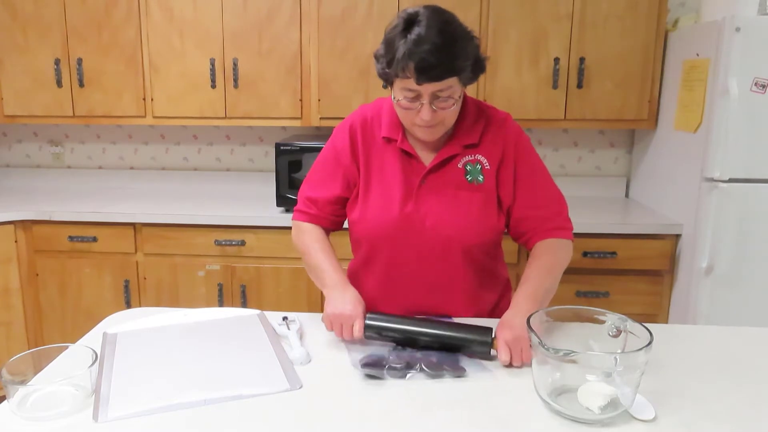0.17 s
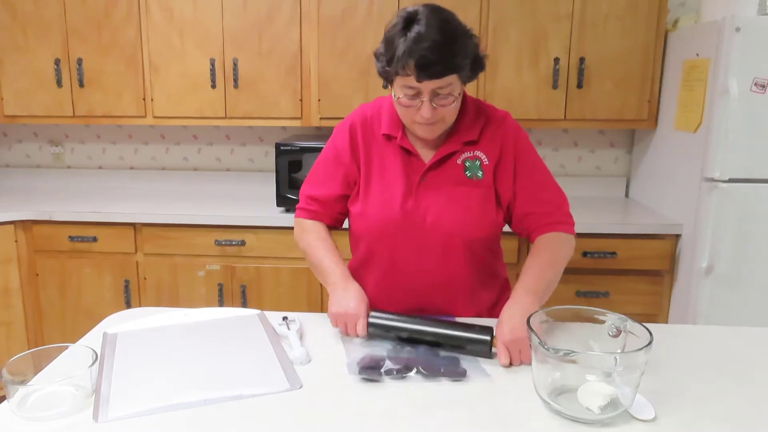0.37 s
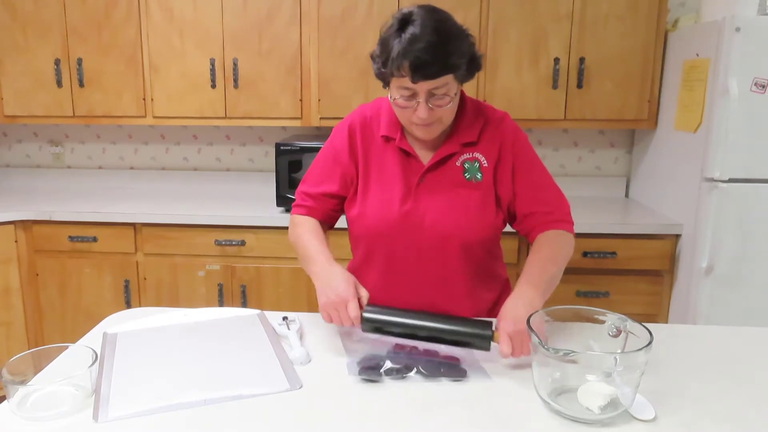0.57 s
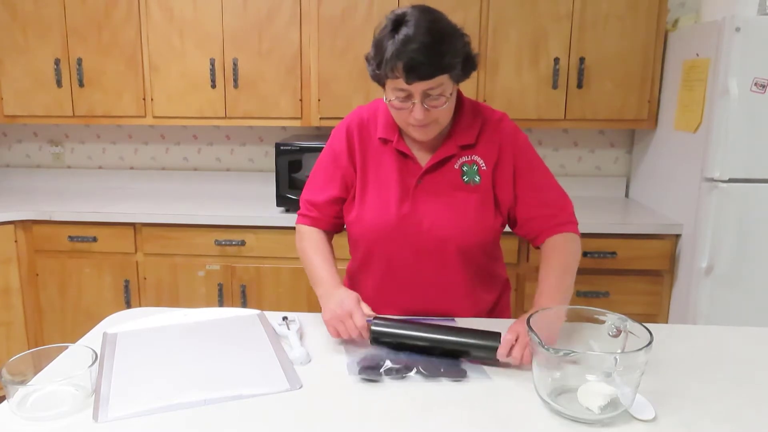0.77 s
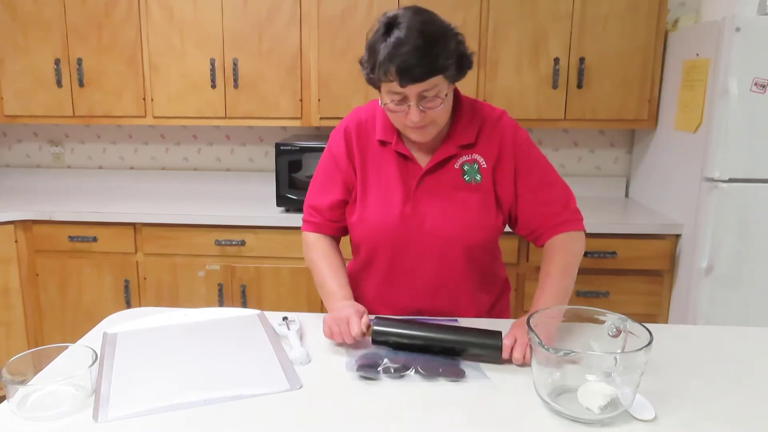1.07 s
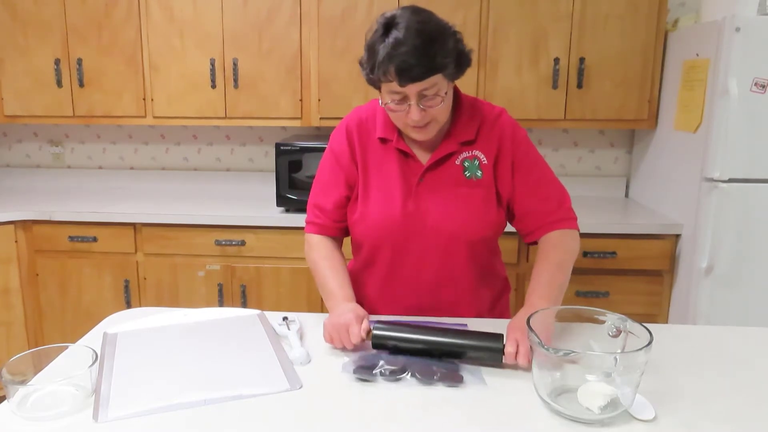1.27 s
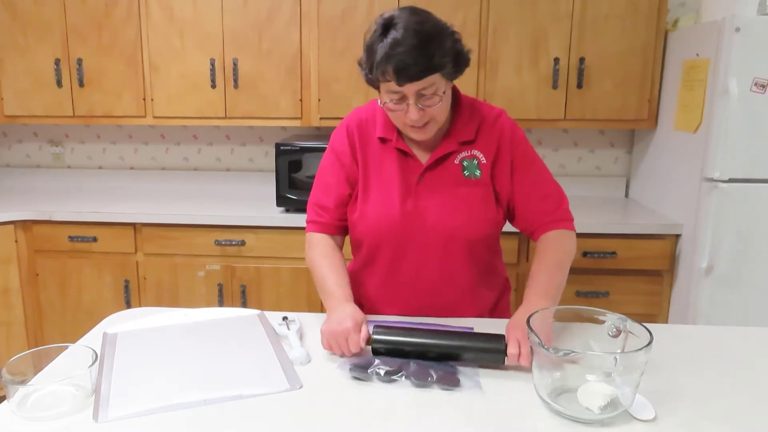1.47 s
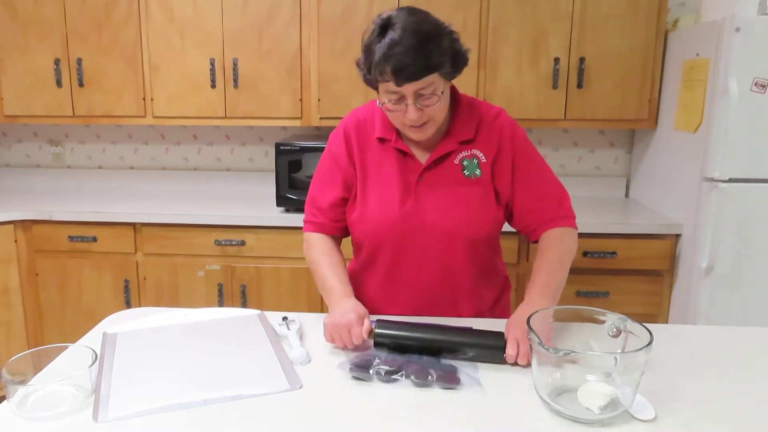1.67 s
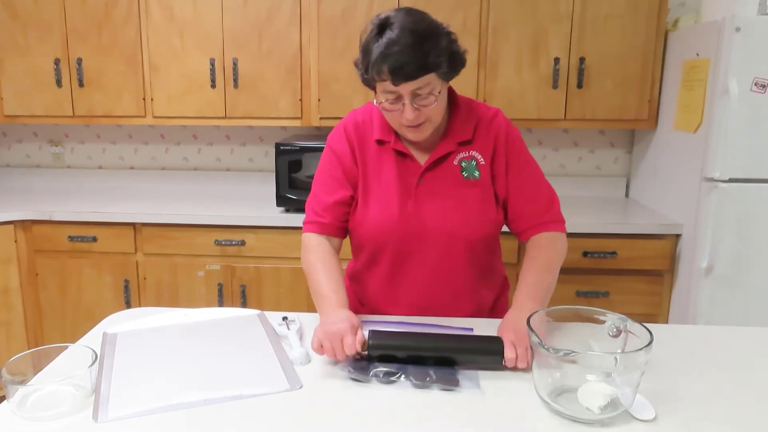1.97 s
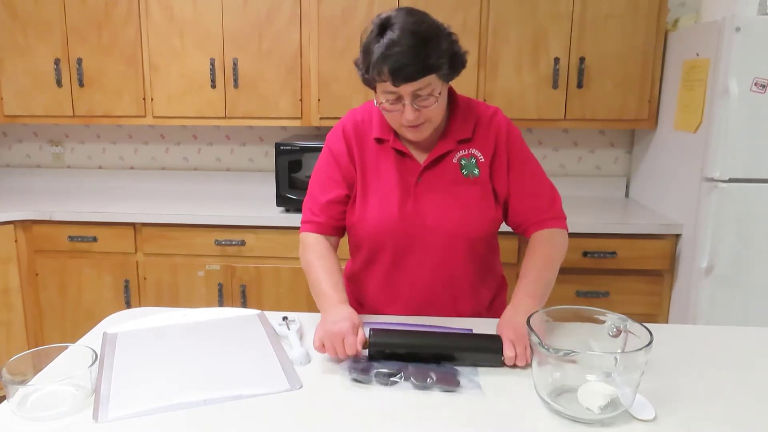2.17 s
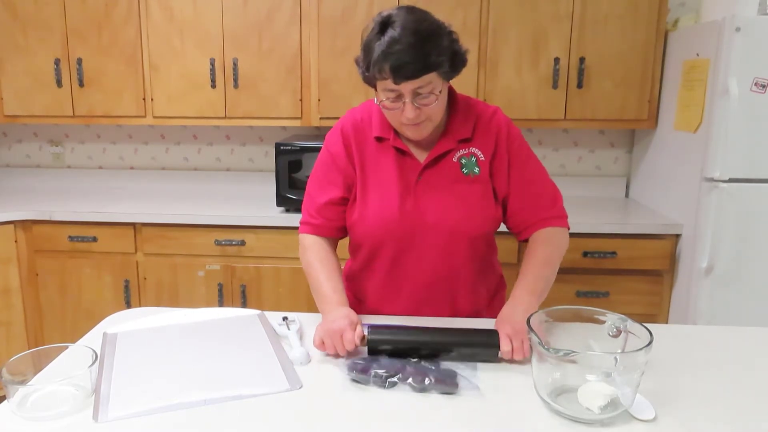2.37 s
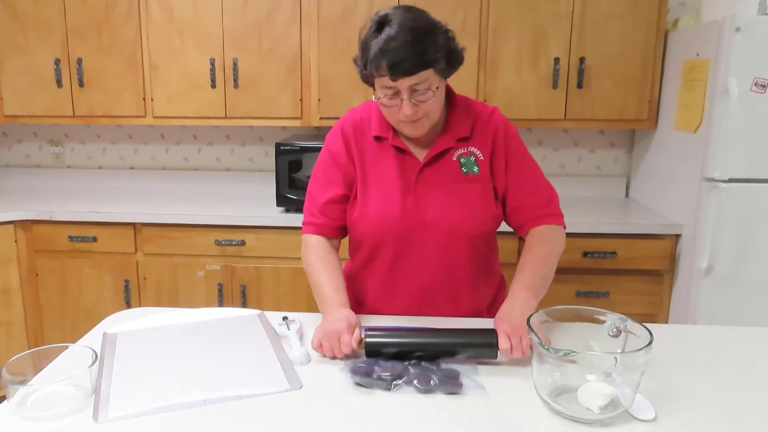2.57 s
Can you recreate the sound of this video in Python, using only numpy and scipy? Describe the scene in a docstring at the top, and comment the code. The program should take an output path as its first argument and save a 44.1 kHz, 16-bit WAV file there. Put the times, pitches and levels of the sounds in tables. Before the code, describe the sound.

Gritty cookie crushing in short rolling-pin strokes, with sharp cracks, bag crinkle and dull counter knocks

```python
"""Cookies in a plastic bag crack under a heavy rolling pin pushed in short strokes on a kitchen counter.
Crumbs are dense random clicks that excite short resonances; snaps are quickly dying noise bursts.
The counter top knocks and rumbles, the pin rings faintly and the cabinet booms, all as banks of
damped modes. Feedback delays make the kitchen's answer; shaped noise is the background air."""
import sys
import numpy as np
from scipy import signal
from scipy.fft import rfft, irfft, next_fast_len
from scipy.io import wavfile

SR = 44100
rng = np.random.default_rng(int(sys.argv[2]) if len(sys.argv) > 2 else 0)


def nominal_scale(level):
    """Amplitude ratio for a level in decibels (scalar or array-like)."""
    x = np.asarray(level, float) / 20
    return 10 ** x


def transcribe(signal):
    """Save signal, clipped to [-1, 1], as a 16-bit WAV file at the path in sys.argv[1]."""
    frames = np.atleast_2d(signal).T
    limited = np.clip(frames, -1, 1)
    pcm = np.round(limited * 32767).astype(np.int16)
    wavfile.write(sys.argv[1], SR, pcm)


N = 121275  # samples

# spectrum of cracking crumbs, shared by grit and snaps: pitch_hz, level_db
CRUMB_SPECTRUM = [(410, -4), (680, -10), (800, -16), (1360, 0.5), (1610, -7), (2830, -2), (7040, -12.5),
                  (13300, -29.5), (15800, -35)]


def rms_one(x):
    """Normalization: scales a signal to unit root mean square."""
    return x / np.sqrt(np.mean(x ** 2) + 1e-20)


def in_time(rows):
    """Linear interpolation: turns (time, values) rows into one curve per value column."""
    s, *columns = np.transpose(rows)
    return [np.interp(np.arange(N) / SR, s, column) for column in columns]


def high_pass(x, hz, order=2):
    """Butterworth filtering: attenuates what lies below the corner."""
    return signal.sosfilt(signal.butter(order, hz, "high", fs=SR, output="sos"), x)


def colour(x, points):
    """Spectral shaping: weights a sound by a table of levels over log frequency."""
    hz, db = np.transpose(points)
    f = np.maximum(np.fft.rfftfreq(N, 1 / SR), 1)
    return irfft(rfft(x) * nominal_scale(np.interp(np.log(f), np.log(hz), db)), N)


def drift(rate_hz):
    """Low-passed noise: a smooth random curve of rms 1."""
    r = np.exp(-2 * np.pi * rate_hz / SR)
    noise = rng.standard_normal(N + SR)
    return rms_one(signal.lfilter([1], [1, -2 * r, r * r], noise)[SR:])


def grains(per_s, spread_db):
    """Random impulse train: clicks of chance time, size and sign, with rms 1."""
    sizes = nominal_scale(spread_db * np.minimum(rng.exponential(1, N), 5)) * rng.choice([-1, 1], N)
    return rms_one(sizes * (rng.random(N) < per_s / SR))


def ring(clicks, hz, t60):
    """Damped resonator: a unit click sets going a decaying sine of initial height 1."""
    r = nominal_scale(-60 / (max(t60, .001) * SR))
    w = 2 * np.pi * min(hz, .45 * SR) / SR
    return signal.lfilter([0, np.sin(w)], [1, -2 * r * np.cos(w), r * r], clicks + 1e-18)


def body(clicks, modes):
    """Modal superposition: a solid sounds as the sum of its damped modes."""
    return sum(nominal_scale(db) * ring(clicks, hz, t60) for hz, db, t60 in modes)


def struck(rows, modes, soft_hz):
    """Impact excitation: a soft blow spares high modes and drives each with a chance strength."""
    s, db = np.transpose(rows)
    chance_db = rng.normal(0, 2.5, (len(s), len(modes)))
    out = 0
    for k, (hz, level_db, t60) in enumerate(modes):
        clicks = np.zeros(N)
        clicks[(s * SR).astype(int)] = -nominal_scale(db + level_db + chance_db[:, k])
        out = out + ring(clicks, hz, t60)
    r = np.exp(-2 * np.pi * soft_hz / SR)
    return signal.lfilter([(1 - r) ** 2], [1, -2 * r, r * r], out)


def stroke_rows():
    """Piecewise envelope: each stroke holds its last levels until the next sets in within 1 ms."""
    # strokes of the pin, one list each: time_s, grit_db, counter_rumble_db, grit_treble_db
    strokes = [
        [(0.0, -47.5, -44, 13.5), (0.076, -60, -68, 6), (0.142, -80, -60, -13), (0.17, -51.5, -61, -30),
         (0.19, -54.5, -56, 2)],
        [(0.199, -32, -21, -9), (0.205, -18, -15, -1.5), (0.233, -39, -31, -5), (0.297, -43.5, -36.5, 9.5),
         (0.325, -39.5, -36, -5)],
        [(0.333, -34, -32.5, 11), (0.379, -29, -20, 5.5), (0.413, -32, -32, 4), (0.477, -36.5, -35, -4),
         (0.55, -58, -54, -11)],
        [(0.558, -47.5, -74, 5), (0.6, -61.5, -80, 1)],
        [(0.611, -47, -68, 12), (0.639, -60.5, -71, -10), (0.697, -72, -55.5, -16), (0.75, -66.5, -55, 7)],
        [(0.766, -26, -39, 0), (0.79, -34, -39.5, 7.5), (0.854, -40, -43.5, 1.5), (0.98, -83, -78, -21),
         (1.03, -59.5, -67, -7.5)],
        [(1.032, -65, -73, 7), (1.072, -42, -34, 6.5), (1.138, -58.5, -42.5, 4), (1.17, -53, -39, 7)],
        [(1.183, -38.5, -21, 6.5), (1.295, -61.5, -53, 17), (1.317, -42.5, -32, 4), (1.395, -39.5, -30, 2),
         (1.41, -42, -22.5, 10)],
        [(1.417, -31, -6.5, -42), (1.443, -44.5, -19.5, 7.5), (1.609, -54.5, -45, 6.5),
         (1.693, -40.5, -28.5, 6.5), (1.82, -65.5, -52.5, 1)],
        [(1.833, -31, -80, -26), (1.843, -42, -69, -31), (1.861, -82, -83.5, -10), (1.943, -66, -68, 3),
         (1.98, -66, -48, 1)],
        [(1.994, -37, -33, 4), (2.126, -33, -18, 2.7), (2.328, -66, -64.5, 16.5), (2.365, -49.5, -32, 11)],
        [(2.376, -34.5, -8.5, -31), (2.388, -38, -12.5, 8), (2.445, -37.5, -24.5, 4), (2.51, -50, -39, 12),
         (2.61, -58.5, -50, 17)],
        [(2.628, -62.5, -49, 10), (2.676, -45, -35, 9), (2.75, -60, -76, 22)],
    ]
    held = []
    for rows, after in zip(strokes, strokes[1:]):
        held.append(rows + [(after[0][0] - .001, *rows[-1][1:])])
    rows = np.vstack(held + strokes[-1:])
    rows[:, 0] = np.maximum.accumulate(rows[:, 0])
    return rows


def grit(level_db, treble_db):
    """Granular fracture: crumbs crack in clumps, each crack ringing briefly at one of 20 pitches."""
    # resonances of bag and crumbs on the counter: pitch_hz, level_db, t60_s
    bag_modes = [(1198, 6.5, 0.0096), (2467, -3.5, 0.029), (2970, 3.5, 0.0032)]
    # strength of those resonances against the grit: time_s, level_db
    bag_level = [(0, 1), (.25, -19), (1.1, -8.5), (2.75, -6)]
    cracks_per_s, clump_db, crack_spread_db = 7000, 4.5, 4.0  # the rate drifts around this value
    crack_cycles = 6.0  # cycles within one t60
    cracks = grains(cracks_per_s * nominal_scale(clump_db * drift(60)), crack_spread_db)
    dealt = rng.integers(0, 20, N)
    rings = 0
    for k, hz in enumerate(np.geomspace(700, 16000, 20)):
        rings = rings + ring(cracks * (dealt == k), hz, crack_cycles / hz) * hz
    rings = rms_one(colour(rings, CRUMB_SPECTRUM))
    bag = rms_one(body(rings, bag_modes))
    rings = rms_one(rings + nominal_scale(in_time(bag_level)[0]) * bag)
    # the treble above about 7500 Hz has a level of its own
    low = signal.sosfiltfilt(signal.butter(2, 7500, fs=SR, output="sos"), rings)
    return nominal_scale(1.5 + level_db) * (low + nominal_scale(treble_db) * (rings - low))


def snaps():
    """Brittle fracture: each snap is a fast-rising, exponentially dying noise burst with a tint."""
    # single snaps of cookies and bag: start_s, level_db, pitch_hz
    snap_rows = [(0.0531, -34, 2520), (0.0676, -34, 2500), (0.129, -47.5, 2830), (0.167, -33.5, 1320),
                 (0.1987, -8, 1770), (0.205, -3, 1570), (0.3327, -16.5, 960), (0.372, -10.5, 1990),
                 (0.56, -49, 2820), (0.608, -50, 3000), (0.7584, -16, 1460), (0.7661, -9.5, 2350),
                 (1.0981, -22, 1300), (1.191, -30, 2550), (1.2238, -27, 2600), (1.231, -27.5, 2580),
                 (1.316, -31, 2350), (1.3554, -24.5, 1990), (1.3745, -18, 2060), (1.4156, -12.5, 1540),
                 (1.475, -26, 1210), (1.561, -30.5, 2740), (1.6776, -35, 4400), (1.7218, -29.5, 2100),
                 (1.832, -24, 1370), (1.9862, -26, 1280), (1.9983, -14.5, 2700), (2.021, -14, 1390),
                 (2.147, -18, 2410), (2.3748, -9, 1240), (2.5534, -31, 2660)]
    rise_s, decay_s = 0.00052, .002  # time constants
    tint_cycles = 8.0  # cycles within one t60
    snap_db, tint_db = -3.5, -1  # added to every snap; tint against its burst
    out, t = np.zeros(N + 4096), np.arange(4096) / SR
    envelope = np.exp(-t / decay_s) * (1 - np.exp(-t / rise_s))
    noise = np.tile(rms_one(colour(rng.standard_normal(N), CRUMB_SPECTRUM)), 2)
    for s, db, hz in snap_rows:
        i = int(s * SR)
        burst = noise[i:i + 4096] * envelope
        tint = rms_one(ring(burst, hz, tint_cycles / hz)) * np.sqrt(np.mean(burst ** 2))
        out[i:i + 4096] += nominal_scale(db + snap_db) * (burst + nominal_scale(tint_db) * tint)
    return high_pass(out[:N], 920)


def counter(rumble_db):
    """Plate vibration: the top rumbles under the rolling pin and knocks when the pin drops."""
    # modes of the counter top, free of the pin's weight: pitch_hz, level_db, t60_s
    top_modes = [(200, -14.5, 0.22), (243, -1.5, 0.14), (309, -2, 0.078), (378.2, 2.5, 0.054),
                 (421, -8, 0.076), (457, -7, 0.07), (563.7, 1.5, 0.046), (654, -2, 0.12), (980, 0, 0.031)]
    # drops of the pin onto the top: start_s, level_db
    knock_rows = [(0.3715, -5), (0.385, -13), (1.1815, -10.5), (1.4165, -4), (2.103, -3.5), (2.115, -8.5),
                  (2.3755, -4.5), (2.386, -12), (2.659, -29.5)]
    # level of the rumble's upper modes: time_s, level_db
    upper_level = [(.3, -3.5), (.4, 10.5), (.52, 12.5), (.7, -6), (.82, 2), (1.05, -6.5), (2.5, -5.5)]
    bumps = grains(800, 1.5)
    (upper_db,) = in_time(upper_level)
    pressed = np.array(top_modes) * [1, 1, 0.61]  # the pin's weight shortens the t60
    rumble = body(bumps, pressed[:4]) + nominal_scale(upper_db) * body(bumps, pressed[4:])
    knocks = nominal_scale(-11) * struck(knock_rows, top_modes, soft_hz=535)
    return nominal_scale(-3.5 + rumble_db) * rms_one(rumble) + knocks


def pin(grit_db):
    """Bending vibration: the pin's upper modes hum at a level tied to the grit; a tap sounds all."""
    # bending modes of the rolling pin: pitch_hz, level_db, t60_s
    pin_modes = [(895, -3, .06), (2309, 1, .11), (4350, -5, .08), (7030, 4, .035), (10280, 3, .016),
                 (14200, 2, .01)]
    # strength of the ringing against the grit: time_s, level_db
    hum_level = [(0, -13), (.95, -18), (1.05, -1.5), (1.38, -7), (1.55, -5.5), (1.78, 0), (1.84, -53),
                 (2.17, -11), (2.75, -3)]
    # the third mode comes and goes with where the pin touches: time_s, level_db
    third_level = [(1.3, -5), (1.66, 4), (1.68, 10.5), (1.78, -1), (2.0, 5)]
    # the bare pin taps something hard: start_s, level_db
    tap_rows = [(1.8318, -31)]
    (share_db,), (third_db,) = in_time(hum_level), in_time(third_level)
    rubs = grains(4600, 2.9)
    hum = rms_one(nominal_scale(third_db) * body(rubs, pin_modes[2:3]) + body(rubs, pin_modes[3:]))
    return nominal_scale(grit_db + share_db) * hum + struck(tap_rows, pin_modes, soft_hz=4270)


def cabinet():
    """Cavity and panel resonance: the hollow cabinet booms; its panels give little deep bass."""
    # modes of the cabinet, the first one deep: pitch_hz, level_db, t60_s
    cabinet_modes = [(40, -21.5, 0.34), (84.9, 0, 0.34), (139.4, 1, 0.068), (172.5, -7.5, 0.16),
                     (229, -6, 0.19)]
    # boom under the pressing: time_s, level_db
    boom_level = [(0.0, -31), (0.15, -68.5), (0.21, -25), (0.51, -40), (0.72, -51), (0.77, -33),
                  (1.02, -53.5), (1.22, -40.5), (1.35, -55), (1.43, -35), (1.94, -77), (2.04, -24.5),
                  (2.34, -47.5), (2.37, -34.5), (2.75, -49.5)]
    # weighty landings of the pin: start_s, level_db
    thud_rows = [(0.201, -9), (0.759, -8), (1.188, -26.5), (1.999, -16), (2.022, -13)]
    (boom_db,) = in_time(boom_level)
    bumps = grains(250, 3.8)
    panels = nominal_scale(-4.5 + boom_db) * rms_one(body(bumps, cabinet_modes[1:4]))
    thuds = nominal_scale(-13.5) * struck(thud_rows, cabinet_modes[1:], soft_hz=300)
    deep = nominal_scale(-4.5 - 8.5 + boom_db) * rms_one(body(bumps, cabinet_modes[:1]))
    return deep + high_pass(panels + thuds, 71.6, order=4)


def kitchen(x):
    """Reverberation: ten parallel feedback delays lose level and treble on every round."""
    t60_s, wall_cut_hz = 0.17, 5800
    size = next_fast_len(N + SR)
    w = 2 * np.pi * np.arange(size // 2 + 1) / size
    dull = 1 / (1 + 1j * w * SR / (2 * np.pi * wall_cut_hz))  # treble loss per 0.22 s of travel
    echo = 0
    for k, lag in enumerate(rng.uniform(.008, .04, 10) * SR):
        lag_s = lag / SR
        loop = nominal_scale(-60 * lag_s / t60_s) * dull ** (lag_s / 0.22) * np.exp(-1j * w * lag)
        echo = echo + (-1) ** k * loop / (1 - loop)
    return irfft(rfft(x, size) * echo, size)[:N]


def air():
    """Stationary noise: a faint steady background with a fixed spectrum."""
    # spectrum of the background: pitch_hz, level_db
    air_spectrum = [(25, -16), (90, 17), (250, -21.5), (1150, -24), (2800, -14.5), (7000, -11),
                    (11000, -25), (16000, -80)]
    return nominal_scale(-64) * rms_one(colour(rng.standard_normal(N), air_spectrum))


def scene():
    """Linear superposition: near sources, their reverberation, the cabinet and the air add up."""
    grit_db, rumble_db, treble_db = in_time(stroke_rows())
    crumbs = high_pass(snaps() + grit(grit_db, treble_db) + pin(grit_db), 550)
    near = crumbs + high_pass(counter(rumble_db), 150, order=4)
    return (near + nominal_scale(-13) * kitchen(near) + cabinet() + air())[None]


def top_cut(x):
    """Nothing passes above the cut-off."""
    return signal.sosfilt(signal.butter(12, 16370, fs=SR, output="sos"), x)


def record(dry):
    """Band limiting and saturation: the microphone drops deep bass, peaks round, the top is cut."""
    peak_limit = .45  # full scale is 1
    mix = high_pass(dry, 42)
    mix = peak_limit * np.tanh(mix / peak_limit)
    mix = signal.sosfilt(signal.cheby2(12, 60, 16350, fs=SR, output="sos"), mix)
    return top_cut(mix)


dry = scene()
out = record(dry)
transcribe(out)
```